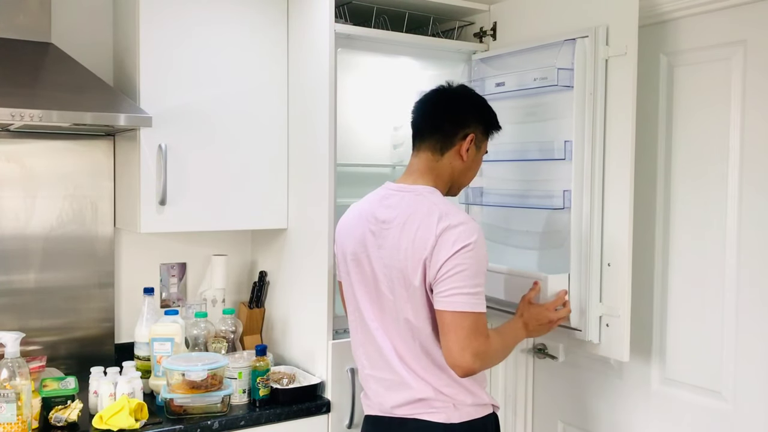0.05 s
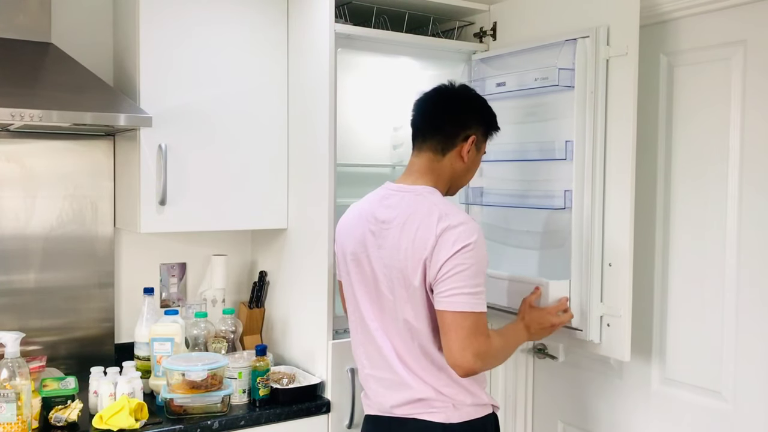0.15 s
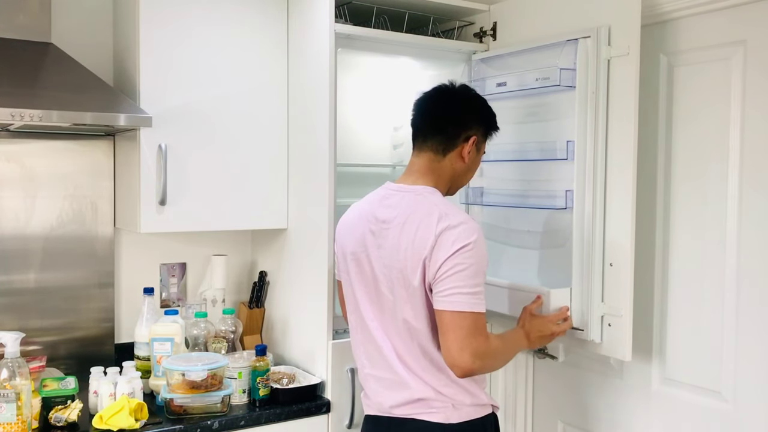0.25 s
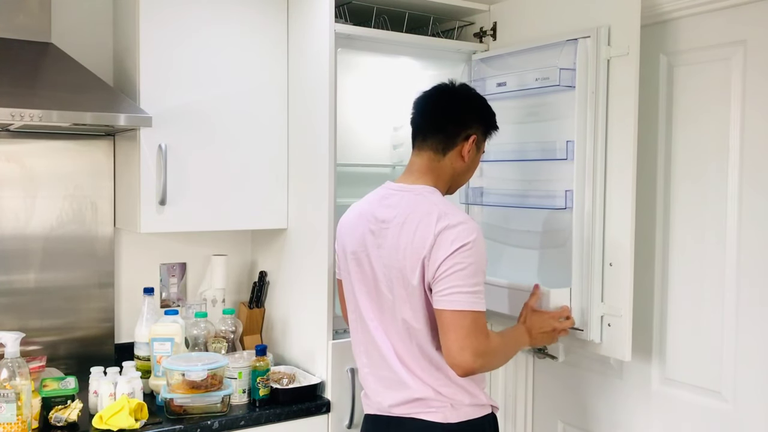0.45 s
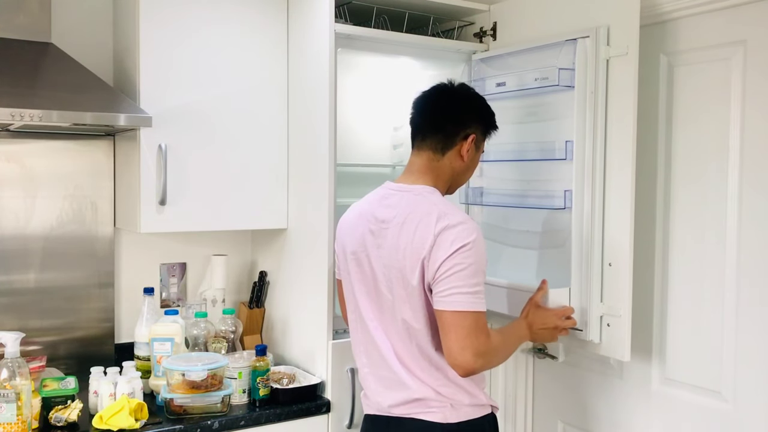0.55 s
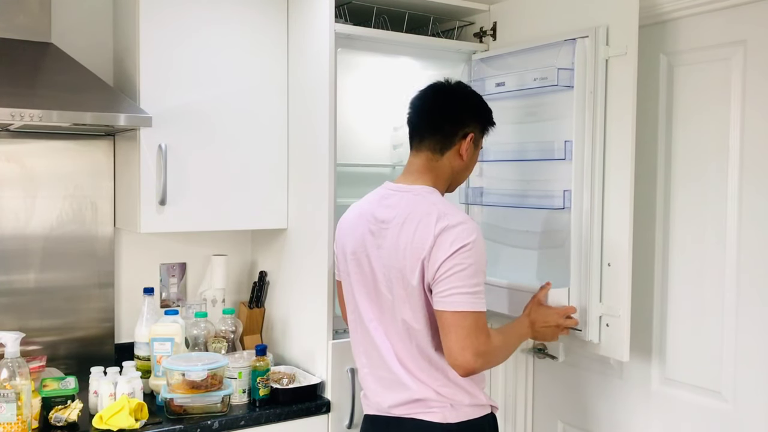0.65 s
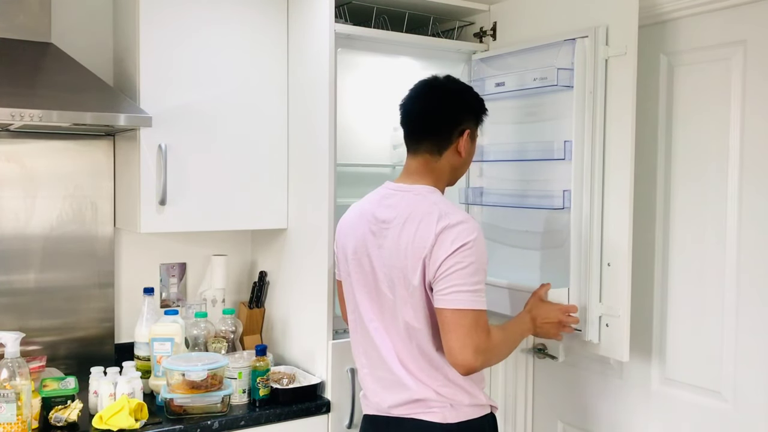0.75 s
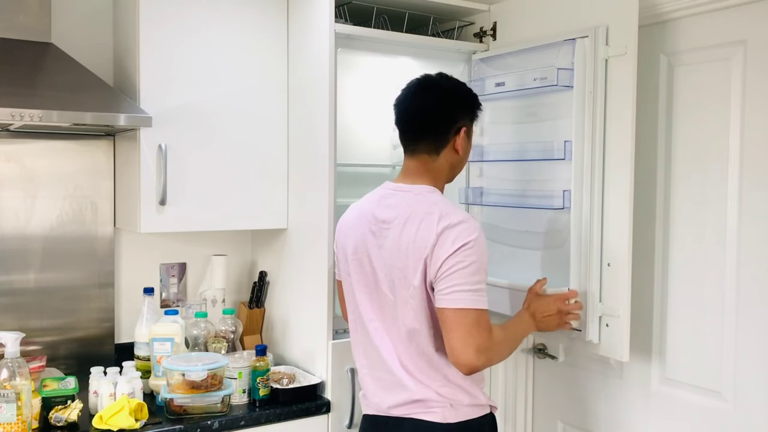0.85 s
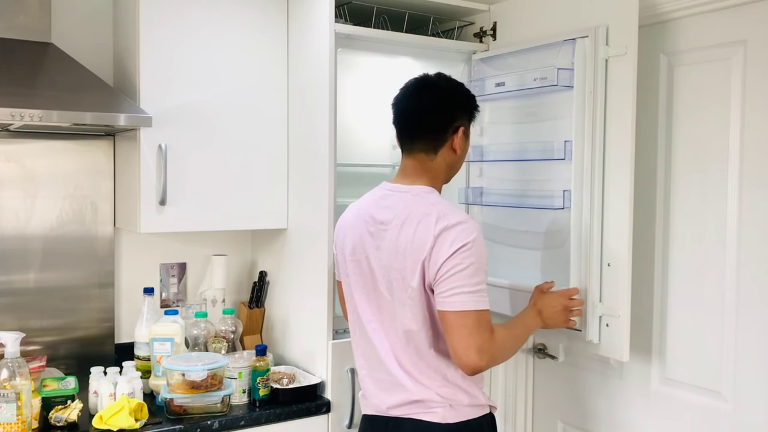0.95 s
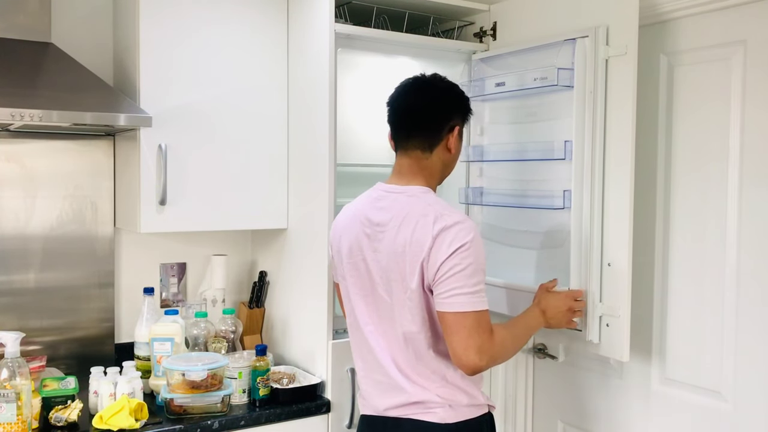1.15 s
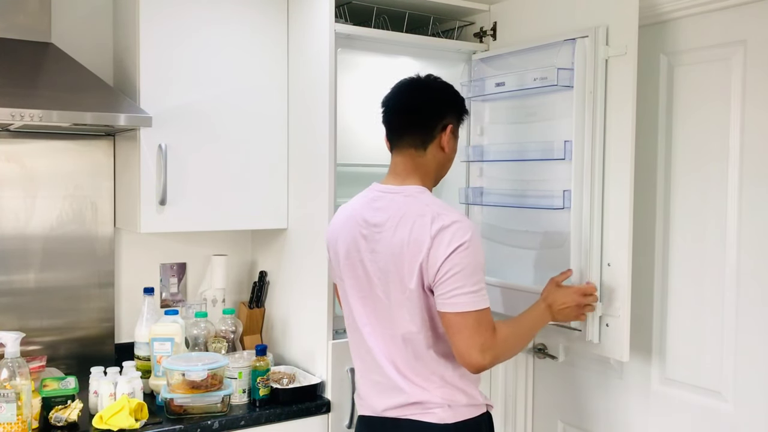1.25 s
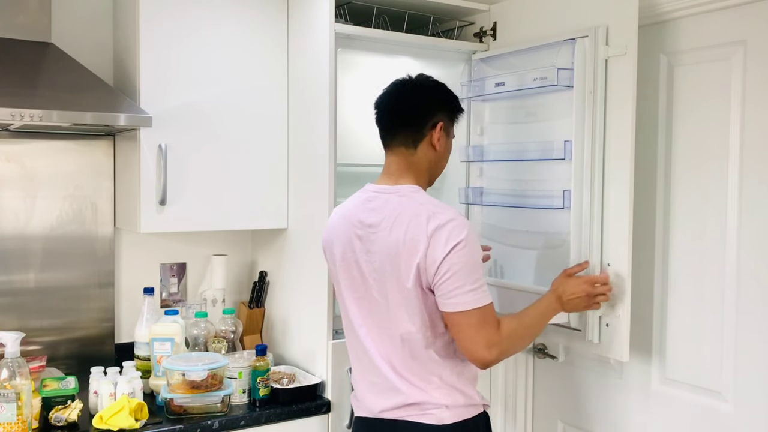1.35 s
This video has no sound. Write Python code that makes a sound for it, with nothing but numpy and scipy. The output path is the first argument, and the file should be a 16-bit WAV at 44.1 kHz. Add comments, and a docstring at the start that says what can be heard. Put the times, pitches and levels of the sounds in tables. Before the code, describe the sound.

A plastic fridge shelf snaps into the door with a sharp thump, then dull knocks.

```python
"""A plastic shelf slides into an open fridge door and seats with a sharp thump. It scrapes in tiny friction
slips, sings faintly, then snaps home and rings the door liner. A low room mode booms, the door shudders with
dull thuds and ticks once; a sleeve rustles, and a hand brushes and bumps the door. Heard from a few steps away,
the quiet, hard-walled kitchen rings after the snap, the scrapes, the knocks and the tick."""
import sys
import numpy as np
from scipy import signal
from scipy.fft import rfft, irfft, next_fast_len
from scipy.io import wavfile
from scipy.ndimage import map_coordinates

SR = 44100
rng = np.random.default_rng(int(sys.argv[2]) if len(sys.argv) > 2 else 0)


def output_pcm(signal):
    """Save a mono or channel-first signal as 16-bit PCM at the path in sys.argv[1].

    Samples are clipped to [-1, 1] before scaling.
    """
    pcm = np.clip(np.atleast_2d(signal).T, -1, 1) * 32767
    wavfile.write(sys.argv[1], SR, np.round(pcm).astype(np.int16))


N = 61739
LEAD = SR // 10  # pre-roll, so sounds can start before time zero
T = (np.arange(N + LEAD) - LEAD) / SR

# The shelf hits its seat, bright edge first, then its full weight.
# Each row: start in seconds, relative level in dB, tilt in dB per octave.
SHELF_CONTACTS = [(0.2004, -22.5, 1.5), (0.203, -18.5, 1.5), (0.207, -18, 0), (0.2131, -21, -1.5),
                  (0.229, -26, -4.5)]
# Booms of the kitchen's lowest room mode. # Each row: start in seconds, pitch in Hz, peak in dB, then rise,
# hold and t60 in seconds.
ROOM_BOOMS = [(-.02, 63.7, -34.5, 0.014, 0.0038, 0.28), (0.138, 63, -41, 0.04, .005, 0.15),
              (0.223, 61.5, -24.5, 0.046, 0.024, 0.32), (.425, 64.3, -39.5, 0.045, 0.0046, .4),
              (0.537, 49.3, -41, 0.037, .01, 0.19), (0.654, 66.4, -35, 0.059, .005, .4),
              (0.946, 65.7, -41.5, 0.023, 0.13, 0.95), (1.091, 65.9, -37.5, 0.043, 0.019, 0.57)]
# Dull bumps of the door. Each row: start in seconds, relative level in dB, rise and t60 in seconds.
DOOR_THUDS = [(-.01, -44, 0.0065, 0.27), (.541, -38.5, 0.0063, 0.23), (.568, -39, 0.0063, 0.34),
              (0.655, -39, 0.01, 0.47), (.688, -39, 0.014, 0.41), (.742, -45, .015, 0.46),
              (.79, -50, 0.028, .4), (.98, -49.5, 0.022, .35)]
# Strokes along the plastic.
# Each row: start and length in seconds, level in dB, rise in seconds, tilt in dB per octave.
SLIDE_STROKES = [(-.06, 0.071, -53.5, 0.0079, -1.5), (.01, 0.073, -59, 0.011, -2.5),
                 (0.082, 0.033, -56.5, 0.014, 0.5), (0.107, 0.023, -48.5, 0.0025, -0.5),
                 (0.124, 0.058, -44.5, 0.0086, 0.5), (.18, 0.025, -44, 0.0088, 0.9),
                 (0.914, 0.067, -60, 0.036, 0.96), (1.363, 0.045, -71.5, 0.015, 4.5)]
# Rubs on the shelf and light knocks on the door. Each row: start in seconds, relative level in dB.
SHELF_RUBS = [(-.03, -54.5), (.125, -51)]
DOOR_KNOCKS = [(0.1068, -48.5), (0.91, -61), (0.96, -46), (0.975, -53)]

# Resonances. Each row: pitch in Hz, relative level in dB, t60 in seconds.
LINER_MODES = [(142.2, -28, 0.47), (194.2, -24.5, 0.25), (247, -21, 0.25), (269.6, -13.5, 0.08),
               (301.8, -27, 0.62), (443, -27, .35), (505.8, -27, 0.35), (610.6, -28.5, 0.58),
               (713.4, -34.5, 0.27), (858, -31.5, .25), (896, -30.5, 0.22), (1005, -30, 0.41),
               (1378, -28.5, 0.19), (1928, -30.5, .18), (2634, -37, 0.17), (2710, -34.5, 0.25)]  # shelf and door liner together
HOLLOW_MODES = [(122.2, -1, .33), (195.8, -9.5, .3), (262.2, -9.5, 0.39), (308.5, -4, 0.24)]  # the hollow door under a soft bump
RUB_MODES = [(248, -5.5, 0.45), (307.3, 4, .7), (437, -0.5, 0.77), (500, -2, 0.52), (542, -5, 0.45),
             (686, -4.5, 0.35)]  # the rubbed shelf
TICK_MODES = [(403, -55.5, 0.41), (498, -54.5, 0.54), (732, -54, .18), (4560, -74, .42)]  # a small part in the door

# Tone colours of the noise layers. Each row: frequency in Hz, relative level in dB.
CRACK_EQ = [(100, -34.5), (270, -6.5), (400, -13), (950, -3.5), (1230, -2.5), (1400, -7), (1730, -6),
            (2000, -3), (2230, -27), (2720, -11.5), (3050, -22.5), (6100, -21.5), (7400, -33),
            (15000, -45.5)]  # hard plastic contact
SHELF_TAIL_EQ = [(59, -40), (100, -1.5), (140, -6), (169, -8.5), (192, -4.5), (310, -2.5), (391, -8.5),
                 (434, -5.5), (524, -6), (607, -3), (814, -6.5), (1000, -8), (1190, -18), (1370, -12.5),
                 (2630, -18), (4940, -32.5), (6350, -31), (7830, -38), (15000, -44.5)]  # the room after that contact
THUD_EQ = [(25, -17), (45, -3.5), (80, -1.5), (120, 4), (200, -8.5), (310, -6), (420, -28), (700, -36.5),
           (1500, -57), (4000, -82.5)]  # the shaking door
SLIDE_EQ = [(59, -39), (100, 1.5), (279, -6.5), (352, -13), (502, 2.5), (582, -11), (1050, -11.5),
            (1260, -23), (1370, -15), (2470, -15), (2860, -18), (4350, -21), (15000, -36.5)]  # friction on plastic
KNOCK_EQ = [(88, -34.5), (150, -3), (337, -13.5), (401, -7.5), (818, -19), (900, -12.5), (1430, -19.5),
            (1570, -18.5), (2020, -14.5), (7640, -36), (15000, -39.5)]  # a light touch on the door
TICK_EQ = [(300, -1.5), (850, 2), (1400, -8), (3000, -12), (4050, -15), (4500, -4.5), (5100, -17),
           (6200, -11.5), (7600, -22), (9200, -14), (10400, -23), (12000, -21), (15000, -21)]  # the small part's click
SLEEVE_EQ = [(500, -12), (3000, -5), (7000, 0), (15000, 2)]  # airy cloth
HUSH_EQ = [(25, 6.5), (65, 9), (110, -3), (250, -5.5), (500, -10.5), (1000, -18.5), (3000, -24),
           (8000, -29.5), (15000, -29)]  # bass-heavy room tone

# The kitchen's reverb. Each row: frequency in Hz, t60 in seconds.
KITCHEN_DECAY = [(100, 0.71), (260, 0.59), (700, 0.59), (1840, 0.58), (4000, 0.59), (6500, 0.58),
                 (9000, 0.41), (12800, 0.31)]


def shelf(clatter_db=-2.5, liner_db=-2):
    """The shelf snaps home in a quick run of contacts and rings the door liner."""
    clatter = sum(
        amp(db) * blow(start, tilted(CRACK_EQ, tilt), tilted(SHELF_TAIL_EQ, tilt), t60=.039, wet_db=-7.5)
        for start, db, tilt in SHELF_CONTACTS)
    liner = ring(LINER_MODES, start=.2065, rise=.0061, blur=.0026)
    return amp(clatter_db) * clatter + amp(liner_db) * liner


def door(shake_db=-1.5, hollow_db=-2):
    """The kitchen's lowest room mode swells after each push; soft bumps shake the door."""
    booms = 0
    for start, hz, db, rise, hold, t60 in ROOM_BOOMS:
        envelope = swell(start, rise) * fade(T - start - rise - hold, t60)
        booms += amp(db) * envelope * np.sin(2 * np.pi * hz * (T - start))
    shake = sum(amp(db) * puff(THUD_EQ, start, rise, t60) for start, db, rise, t60 in DOOR_THUDS)
    hollow = sum(amp(db) * ring(HOLLOW_MODES, start, rise, blur=.02) for start, db, rise, _ in DOOR_THUDS)
    return booms + amp(shake_db) * shake + amp(hollow_db) * hollow


def slides(slips_per_s=14000, scatter_db=3.5, wet_db=.5):
    """Friction: a stream of tiny slips under each stroke, spread by the room."""
    count = len(T)
    slips = (rng.random(count) < slips_per_s / SR) * rng.standard_normal(count)
    slips *= amp(scatter_db * rng.standard_normal(count))
    scrape = 0
    for start, length, db, rise, tilt in SLIDE_STROKES:
        envelope = swell(start, rise) * fade(T - start - length, t60=.035)
        scrape += amp(db) * envelope * coloured(slips, tilted(SLIDE_EQ, tilt))
    room = kitchen_tail(0, [(1000, 0)])[LEAD:]  # flat EQ: the bare room response
    reverb = signal.fftconvolve(scrape, room / np.linalg.norm(room))[:count]
    return scrape + amp(wet_db) * reverb


def rubs():
    """Rubbing wakes the shelf's low modes, and it sings faintly."""
    return sum(amp(db) * ring(RUB_MODES, start, rise=.013, blur=.0074) for start, db in SHELF_RUBS)


def knocks():
    """The shelf and the hand land lightly on the door."""
    return sum(amp(db) * blow(start, KNOCK_EQ, KNOCK_EQ, t60=.038, wet_db=-5) for start, db in DOOR_KNOCKS)


def tick(start=.767, click_db=-61.5):
    """A small part in the door clicks and leaves a thin ring."""
    click = blow(start, TICK_EQ, TICK_EQ, t60=.044, wet_db=3)
    return amp(click_db) * click + ring(TICK_MODES, start, rise=.008, blur=.012)


def sleeve(level_db=-72.5):
    """A faint hiss of cloth as the arm moves."""
    return amp(level_db) * puff(SLEEVE_EQ, start=.586, rise=.04, t60=1)


def kitchen_tail(start, eq):
    """The hard walls answer a blow with a wash of noise; the treble dies first."""
    hz, times, bands = signal.stft(noise(eq), SR, nperseg=256)
    decay = fade(times + T[0] - start, along(KITCHEN_DECAY, hz)[:, None])
    wash = signal.istft(bands * decay, SR)[1]
    return wash[:len(T)] * swell(start, rise=.0054)


def hush(level_db=-60.5):
    """A steady bed of low room tone."""
    return amp(level_db) * noise(HUSH_EQ)


def blow(start, crack_eq, tail_eq, t60, wet_db):
    """A short crack followed by the room."""
    crack = noise(crack_eq) * swell(start, rise=.0012) * fade(T - start, t60)
    return crack + amp(wet_db) * kitchen_tail(start, tail_eq)


def puff(eq, start, rise, t60):
    """Noise that swells, then dies away."""
    return swell(start, rise) * fade(T - start - rise, t60) * noise(eq)


def ring(modes, start, rise, blur):
    """Struck, damped modes; blur is how far each wavers, as a share of its pitch."""
    tone = 0
    for hz, db, t60 in modes:
        cycles = hz * (T - start + blur * np.cumsum(waver()) / SR) + rng.random()
        tone += amp(db) * fade(T - start, t60) * np.sin(2 * np.pi * cycles)
    return swell(start, rise) * tone


def waver(points_per_s=150):
    """A smooth random wobble."""
    positions = np.arange(len(T)) * points_per_s / SR
    return map_coordinates(rng.standard_normal(len(T) // 20), [positions], mode="wrap")


def swell(start, rise):
    """A smooth attack from 0 to 1."""
    return np.sin(np.pi / 2 * np.clip((T - start) / max(rise, 1e-4), 0, 1)) ** 2


def fade(age, t60):
    """Full level until age 0, then down 60 dB every t60 seconds."""
    return np.exp(-np.log(1000) * np.maximum(age, 0) / t60)


def noise(eq):
    """Fresh coloured noise at rms 1."""
    return coloured(rng.standard_normal(len(T)), eq)


def coloured(x, eq):
    """A signal through an EQ curve, brought to rms 1."""
    shaped = filtered(x, lambda hz: amp(along(eq, hz)))
    return shaped / np.sqrt(np.mean(shaped ** 2) + 1e-20)


def tilted(eq, db_per_octave, pivot_hz=900):
    """An EQ curve tipped brighter or darker."""
    return [(hz, db + db_per_octave * np.log2(hz / pivot_hz)) for hz, db in eq]


def filtered(x, response):
    """Apply a gain that depends on frequency."""
    size = next_fast_len(len(x) + SR // 2)
    gain = response(np.fft.rfftfreq(size, 1 / SR))
    return irfft(rfft(x, size) * gain, size)[:len(x)]


def along(curve, hz):
    """Read a curve on a log frequency axis."""
    freqs, values = np.transpose(curve)
    return np.interp(np.log(hz + 1), np.log(freqs + 1), values)


def amp(db):
    """Decibels to gain."""
    return 10 ** (np.asarray(db) / 20)


def scene():
    """Shelf, door and small handling sounds over the kitchen's hush, in mono."""
    mix = shelf() + door() + slides() + rubs() + knocks() + tick() + sleeve() + hush()
    return mix[None, LEAD:]


def record(dry, low_cut_hz=18, top_hz=15750):
    """Roll off the deepest bass and cut the very top."""
    def passband(hz):
        return (hz < top_hz) / np.sqrt(1 + (low_cut_hz / (hz + 1)) ** 10)
    return np.array([filtered(channel, passband) for channel in dry])


dry = scene()
out = record(dry)
output_pcm(out)
```